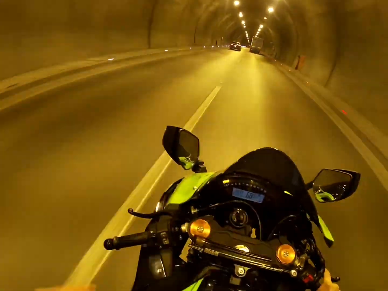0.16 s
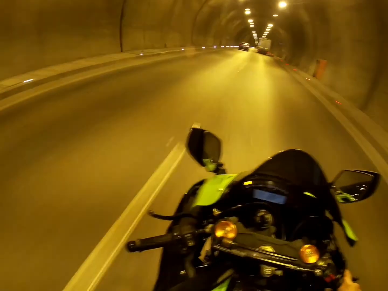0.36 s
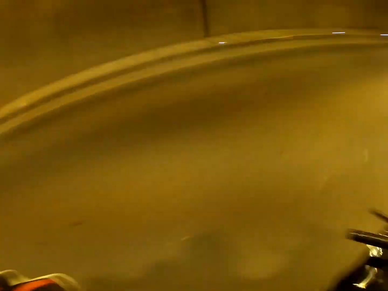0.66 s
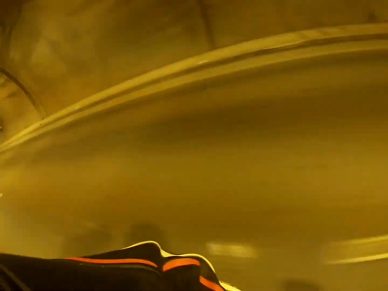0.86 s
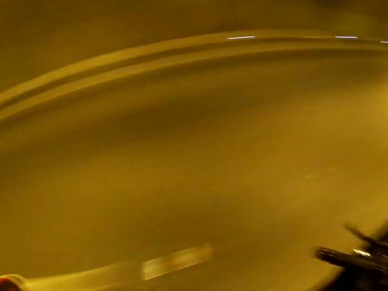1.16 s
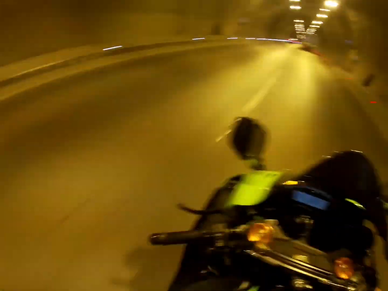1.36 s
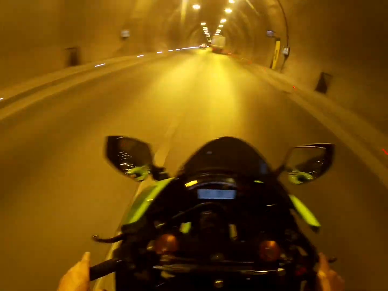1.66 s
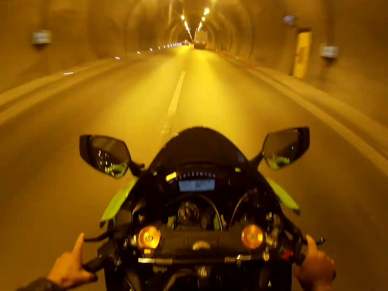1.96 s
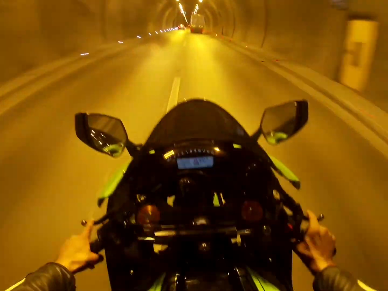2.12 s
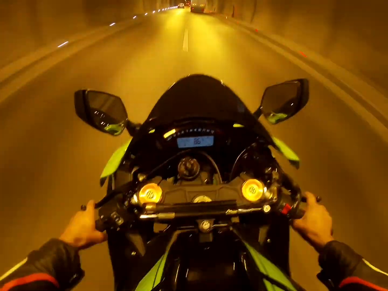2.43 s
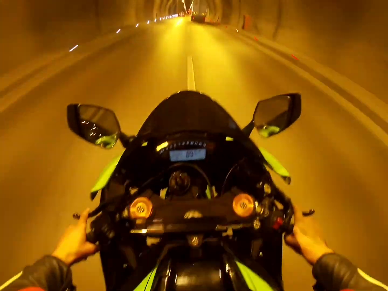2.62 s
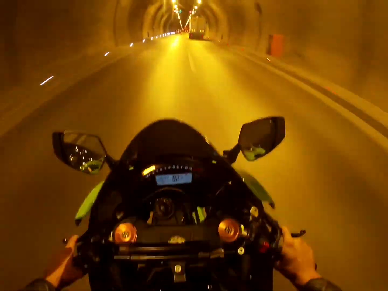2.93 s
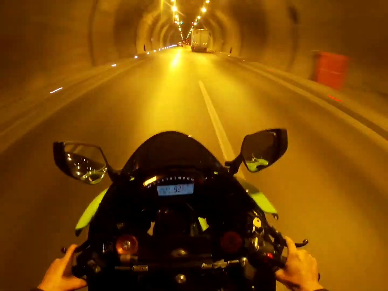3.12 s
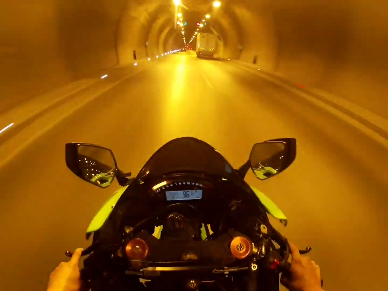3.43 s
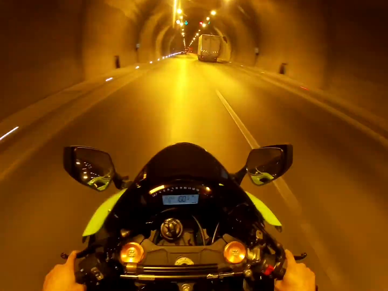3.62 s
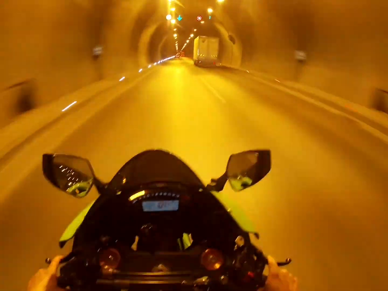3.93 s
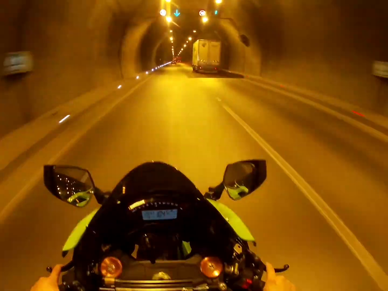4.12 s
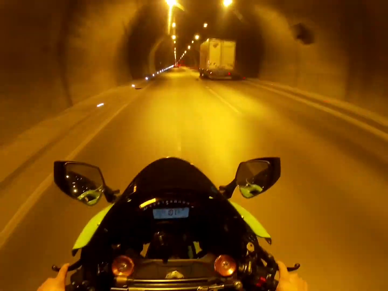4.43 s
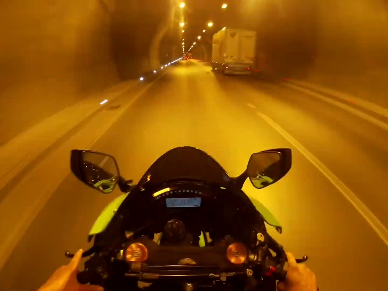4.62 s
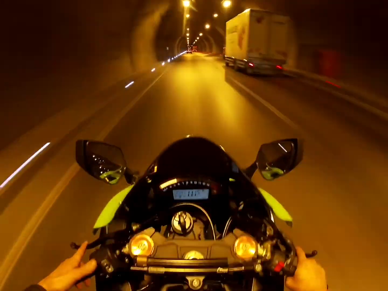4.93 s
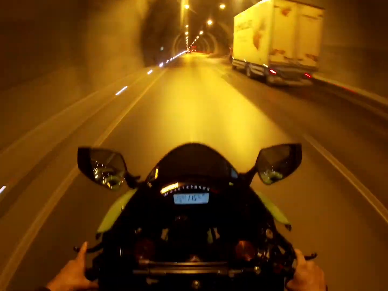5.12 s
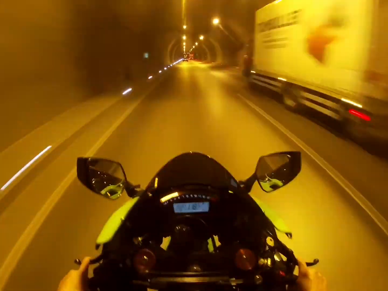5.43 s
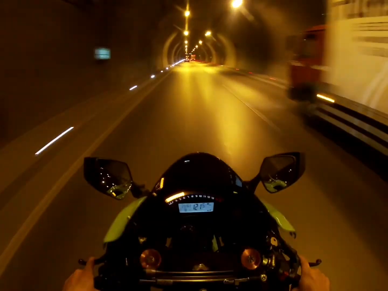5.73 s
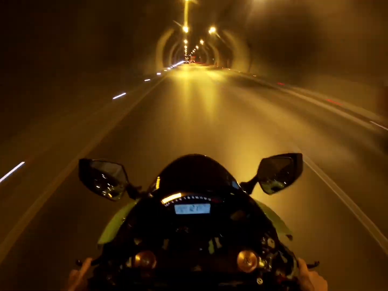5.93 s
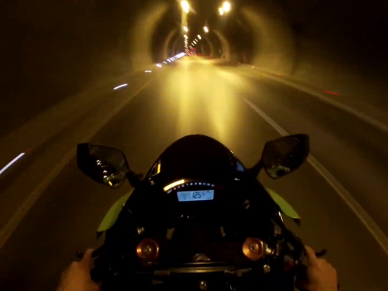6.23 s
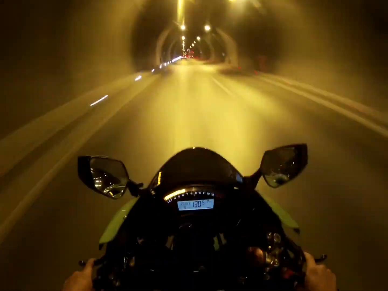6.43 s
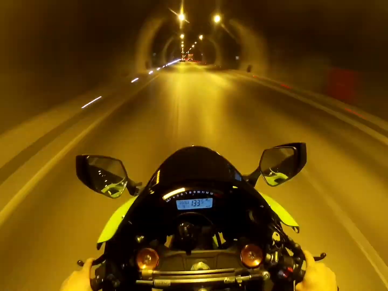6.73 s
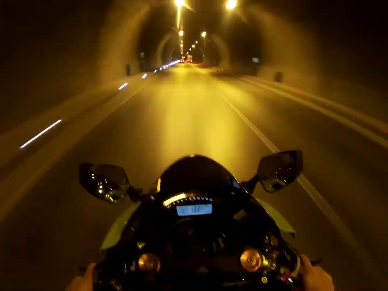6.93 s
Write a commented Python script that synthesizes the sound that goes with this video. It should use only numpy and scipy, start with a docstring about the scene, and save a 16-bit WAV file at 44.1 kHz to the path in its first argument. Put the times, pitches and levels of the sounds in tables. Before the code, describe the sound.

A microphone at a motorcycle rider's helmet captures about 7 seconds of unbroken acceleration in one gear inside a road tunnel. At 0 s the four-cylinder engine is a buzzy low drone around 107 Hz, with a raspy edge and a wavering low hum. From 0.5 to 1.3 s the air noise dips, then flutters, while tunnel rumble swells. From about 1.5 s small wind gusts come and go and the intake roar builds; gear whine shows faintly in the treble, clearest around 2.4-4.8 s. Roar and wind are strongest near 4-5 s. After 5.5 s the roar and whine recede, leaving a smoother, heavier howl reaching about 220 Hz at the end. Throughout, the tones flicker, fade and beat with slightly lower-pitched wall echoes over deep booming rumble. The sound is mildly saturated, with muffled treble, and stops while still climbing.

```python
"""A four-cylinder sport motorcycle accelerates in one gear through a road tunnel, heard at the helmet.
Exhaust orders, sines at multiples of the firing rate, glide up, beat with a wall copy, fade and dip.
Delayed copies of the engine off the passed wall ribs drop in pitch.
Intake roar and wind hiss (shaped noise), tunnel rumble, gear whine and a low wavering hum lie under it.
The input stage rounds the peaks; the camera case dulls the treble."""
import sys
import numpy as np
from scipy import signal
from scipy.fft import rfft, irfft
from scipy.io import wavfile
from scipy.ndimage import uniform_filter1d

SR = 44100
rng = np.random.default_rng(int(sys.argv[2]) if len(sys.argv) > 2 else 0)


def inscribe(sig):
    """Save sig as 16-bit PCM at rate SR to the path in sys.argv[1].

    A 1-D sig is mono; a 2-D sig holds one channel per row.
    Samples are clipped to [-1, 1] before scaling.
    """
    pcm = np.round(np.clip(np.atleast_2d(sig).T, -1, 1) * 32767)
    wavfile.write(sys.argv[1], SR, pcm.astype(np.int16))


N = 311785
TIME_S = np.arange(N) / SR

# air noise at the helmet before gusts: (time [s], intake roar [dB], wind base [dB])
AIR_DB = [(0, -35.5, -45.5), (.3, -31, -42.5), (.6, -29.5, -40), (.72, -38, -45), (1.08, -28, -46),
          (1.2, -29, -42.5), (1.5, -34.5, -43), (1.9, -27.5, -43), (2.5, -28.5, -44), (3.0, -25.5, -39),
          (3.4, -23.5, -38.5), (4.0, -24.5, -35.5), (4.2, -20.5, -35), (4.47, -27, -36.5),
          (4.52, -21.5, -32.6), (4.72, -22, -32), (4.8, -23.5, -35.5), (4.97, -23, -36.5), (5.25, -25, -35),
          (5.5, -27, -36), (5.6, -27.5, -38), (5.85, -32.5, -40), (6.1, -31, -38.5), (6.3, -29, -39),
          (6.55, -34.5, -39.5), (6.7, -27.5, -38), (7.07, -29.5, -39)]
# short rises and lulls of the air noise: (time [s], rise [dB], negative = lull)
GUSTS_AND_LULLS = [(.32, 0.5), (1.32, 2), (1.62, 2.5), (1.87, 3), (2.03, 4), (2.42, 0.5), (2.78, 3.5),
                   (3.12, 1.5), (3.37, 4), (3.57, 1.5), (3.76, 4), (4.0, -3.5), (4.54, 0), (5.23, 0.5),
                   (6.08, 3), (6.42, -2), (6.57, -5), (6.77, 0), (6.87, -4.5)]
GUST_HALF_S = .036


def undb(db):
    """Amplitude ratio of a dB value."""
    return 10 ** (np.asarray(db) / 20)


def curve(rows):
    """Columns of a time table, one value a sample."""
    s, *columns = np.transpose(rows)
    return [np.interp(TIME_S, s, column) for column in columns]


def colour(shape, hz):
    """dB of a spectrum at hz, interpolated over log frequency."""
    shape_hz, shape_db = np.transpose(shape)
    return np.interp(np.log(hz), np.log(shape_hz), shape_db)


def bells(rows, half_s):
    """A dB curve with one bell for each (time [s], height [dB]) row."""
    return sum(db * np.exp(-((TIME_S - s) / half_s) ** 2) for s, db in rows)


def swells(multiple):
    """dB curve of the stretches in which one upper order or gear tone stands out or sinks."""
    # (time [s], multiple of the firing rate [-], rise [dB], negative = it sinks)
    swell_rows = [(.45, 5.5, 5), (1.05, 6, 6), (1.05, 8, 9), (1.35, 41.65, 7), (1.6, 9, 3), (1.7, 4.5, -10),
                  (1.95, 7, 5), (2.1, 6.5, 7), (2.55, 6, 4), (2.55, 6.5, -5), (2.25, 35.7, 6),
                  (2.7, 35.7, 2), (2.45, 29.75, 6), (5.55, 4.5, 4), (5.55, 5, 3), (3.7, 6.5, 2),
                  (3.9, 29.75, 3), (.85, 5, 4), (.25, 5, 3), (.3, 4.5, 3), (3.25, 29.75, 6), (3.45, 7.5, 7),
                  (4.05, 7, 8), (4.2, 5, 2), (4.5, 29.75, 6), (5.85, 4.5, -4)]
    return bells([(s, db) for s, k, db in swell_rows if k == multiple], half_s=.22)


def walk(rate):
    """Random levels held 1 / rate s and slewed twice; spread near 1."""
    hold = int(SR / rate)
    steps = np.repeat(rng.standard_normal(N // hold + 1), hold)
    return 1.7 * uniform_filter1d(uniform_filter1d(steps, hold), hold)[:N]


def noise(shape, swell_db, flicker_db, rate):
    """Coloured noise in half-octave bands that swell together and flicker alone; rms 1."""
    hz = np.maximum(np.fft.rfftfreq(N, 1 / SR), 1)
    low_hz, high_hz = shape[0][0], shape[-1][0]
    inside = (hz >= low_hz) & (hz <= high_hz)
    spectrum = rfft(rng.standard_normal(N)) * undb(colour(shape, hz)) * inside
    common_db = swell_db * walk(rate)
    out = np.zeros(N)
    for centre in np.arange(2 * np.log2(low_hz), 2 * np.log2(high_hz) + 1):  # half octaves
        share = np.clip(1 - np.abs(2 * np.log2(hz) - centre), 0, 1)
        out += irfft(spectrum * share, N) * undb(common_db + flicker_db * walk(rate))
    return out / np.sqrt(np.mean(out ** 2))


def low_hum():
    """A tone wavering in pitch and level like a randomly shaken resonance, perhaps the fairing."""
    hum_db = [(0.0, -31), (0.2, -16.5), (0.6, -19), (1.4, -24.5), (2.3, -24), (2.45, -13.5), (2.62, -23),
              (2.8, -23.5), (3.0, -25), (3.2, -16), (3.45, -18.5), (3.8, -37), (4.3, -22.5), (5.0, -40.5),
              (5.7, -30.5), (5.85, -31), (6.0, -28.5), (6.3, -24), (6.45, -33), (7.07, -50)]  # (time [s], level before wavering [dB])
    phase = 2 * np.pi * np.cumsum(65.5 + 3 * walk(18)) / SR
    return np.sqrt(2) * undb(curve(hum_db)[0] + .78 * walk(10)) * np.sin(phase)


def tunnel_rumble():
    """Two bands of shaped noise between the orders, each on its own level curve."""
    rumble_db = [(0, -26, -28), (.5, -21, -21), (1, -18.5, -17.5), (1.5, -26, -23.5), (2, -25, -20.5),
                 (2.5, -19.5, -26), (3, -16.5, -21), (3.5, -16.5, -25), (4, -17, -21), (4.5, -18, -24),
                 (5, -19, -24.5), (5.5, -18, -28.5), (6, -17.5, -30.5), (6.5, -22, -24.5),
                 (7.07, -18.5, -37)]  # (time [s], deep part [dB], upper part [dB])
    # spectra of the parts: (frequency [Hz], relative level [dB])
    deep_shape = [(20, -5.5), (35, -3.5), (60, -5.5), (95, -7.5), (135, -2.5), (175, -4.5), (230, -2.5),
                  (300, -29)]
    upper_shape = [(160, -14), (230, -3), (280, -1.5), (420, 1), (520, -9.5), (700, -18.5)]
    deep_db, upper_db = curve(rumble_db)
    deep = undb(deep_db) * noise(deep_shape, swell_db=.7, flicker_db=1.5, rate=9)
    upper = undb(upper_db) * noise(upper_shape, swell_db=.7, flicker_db=1.5, rate=9)
    return deep + upper


def gear_whine(phase):
    """Tooth-mesh tones, blurred by random phase, let out by the gear case in one band."""
    gear_rows = [(23.8, -8), (29.75, -8), (35.7, -6), (41.65, -11)]  # (tooth meshes per firing [-], relative level [dB])
    case_shape = [(3000, -26), (3500, -17), (3900, -24), (4300, -15), (4600, -13), (5300, -14), (5700, -22),
                  (6200, -44), (8000, -75), (11000, -90)]  # (frequency [Hz], relative level [dB])
    # the whine sinks under the wind at speed: (time [s], relative level [dB])
    whine_db = [(0, -2), (2, -1), (2.4, 2), (3.4, 2), (4.8, 0), (5.5, -8), (7.07, -9)]
    hz = np.gradient(phase) * SR / (2 * np.pi)
    tones = np.zeros(N)
    for k, db in gear_rows:
        tone_db = db + colour(case_shape, k * hz) + swells(k) + 1 - 2.2 * walk(20) ** 2
        tones += undb(tone_db) * np.sin(k * phase + 1.3 * walk(60))
    return undb(curve(whine_db)[0]) * tones


def wind(phase):
    """Air noise at the helmet: gusting hiss that carries the gear whine, and a thin treble that follows it."""
    # spectra: (frequency [Hz], relative level [dB])
    hiss_shape = [(900, 1.5), (1500, 2.5), (2500, -4.5), (4000, -9.5), (5300, -11), (6000, -16.5),
                  (6800, -30.5), (7500, -34.5), (9000, -53.5)]
    thin_shape = [(6000, -2.5), (7300, -6), (8500, 2), (9200, -5), (10500, -9.5), (12300, -11.5)]
    random_gusts_db = .3 * walk(40)
    wind_db = curve(AIR_DB)[1] + bells(GUSTS_AND_LULLS, GUST_HALF_S) + random_gusts_db
    hiss = noise(hiss_shape, swell_db=.3, flicker_db=.7, rate=29)
    # sags 1.6 dB per s and follows .9 of the wind's departure from -41 dB
    thin_db = -61 - 1.6 * TIME_S + .9 * (wind_db + 41)
    thin = undb(thin_db) * noise(thin_shape, swell_db=1.6, flicker_db=.9, rate=33)
    return undb(wind_db + 3.5) * (hiss + gear_whine(phase)) + thin


def intake(hz, phase):
    """Weaker orders through the airbox, each fading on its own, over air roar puffed once per firing."""
    # halves come once per crank turn:
    # (multiple of the firing rate [-], relative level [dB], addition at the start, before load [dB])
    upper_orders = [(4.5, -13, 7), (5, -10, 4), (5.5, -12, -3), (6, -11, -4), (6.5, -11, -10), (7, -18, 0),
                    (7.5, -19, -6), (8, -16, -5), (8.5, -22, -3), (9, -17, -1), (9.5, -22, -2),
                    (10, -18, -1), (11, -20, 0), (12, -22, 0)]
    airbox_shape = [(450, 2), (560, 0), (800, 0), (900, 1), (1160, 0), (1220, -7), (1350, -11), (2500, -12)]  # (frequency [Hz], relative level [dB])
    roar_shape = [(220, 10.5), (420, 1), (550, 4), (800, 2.5), (1100, 1), (1400, -8.5), (2200, -37.5)]  # (frequency [Hz], relative level [dB])
    orders_in_roar_db = [(0, 0), (2, -1.5), (3, 1), (5.2, 0.5), (5.8, -7.5), (7.07, 0.5)]  # (time [s], orders against the roar [dB])
    on_load_s = 3.
    light_load = np.clip(1 - TIME_S / on_load_s, 0, 1)
    orders = np.zeros(N)
    for k, db, early_db in upper_orders:
        order_db = db + early_db * light_load + swells(k) + colour(airbox_shape, k * hz)
        fade_db = 1.9 * walk(15) ** 2
        orders += undb(order_db + 2 - fade_db) * np.sin(k * phase + .42 * walk(30))
    orders *= np.sqrt(2) * undb(curve(orders_in_roar_db)[0])
    puffs = 1 + .4 * np.sin(phase)
    roar = puffs * noise(roar_shape, swell_db=1.1, flicker_db=.9, rate=11)
    gusts = undb(.8 * bells(GUSTS_AND_LULLS, GUST_HALF_S))  # the roar shows .8 of the dB change
    return undb(curve(AIR_DB)[0]) * (orders + gusts * roar)


def wall_echoes(engine, hz):
    """Each rib of the lining echoes as it slides by; the path grows behind the bike, so the pitch drops."""
    metres_per_firing, wall_m, rib_spacing_m, sound_m_per_s = .21, 5., 5., 343.
    place_m = np.cumsum(hz) * metres_per_firing / SR
    ribs_m = np.arange(-30, place_m[-1] + 10, rib_spacing_m)
    chance = rng.standard_normal((len(ribs_m), 2))
    out = np.zeros(N)
    for rib_m, (shift_m, size) in zip(ribs_m, chance):
        at_m = rib_m + shift_m
        lo, hi = np.searchsorted(place_m, [at_m - 8, at_m + 32])
        behind_m = place_m[lo:hi] - at_m
        path_m = 2 * np.hypot(wall_m, behind_m)
        # the pipe points backwards; far ribs fade out
        aim = np.clip((behind_m + 8) / 14, 0, 1) * np.clip((32 - behind_m) / 16, 0, 1)
        delayed = np.arange(lo, hi) - path_m / sound_m_per_s * SR
        heard = np.interp(delayed, np.arange(N), engine, left=0)
        out[lo:hi] += undb(4.5 * size) * aim * 2 * wall_m / path_m * heard
    return out


def exhaust(hz, phase):
    """The low orders as lines; a blurred copy off the receding wall lies a little lower and beats with each."""
    # level before fading: (time [s], first order [dB], second [dB], third [dB])
    main_orders_db = [(0.0, -15.5, -9, -20), (0.2, -18, -15.5, -20.5), (0.4, -20, -19.5, -17),
                      (0.6, -20.5, -17.5, -11.5), (0.8, -20, -16.5, -13), (1.0, -11.5, -19.5, -15.5),
                      (1.2, -12, -17, -11.5), (1.4, -17, -14, -16), (1.6, -14, -13, -13.5),
                      (1.8, -10.5, -12, -14.5), (2.0, -11.5, -9.5, -27), (2.2, -9, -18.5, -16),
                      (2.4, -12, -20.5, -16), (2.6, -12, -12, -16.5), (2.8, -14, -13, -17.5),
                      (3.0, -12.5, -13, -28), (3.2, -15.5, -21.0, -19.5), (3.4, -19.5, -17.5, -22.5),
                      (3.6, -12, -13, -19.5), (3.8, -8.5, -20, -22), (4.0, -12.5, -16, -23.5),
                      (4.2, -14.5, -17.5, -28), (4.4, -11, -13, -33), (4.6, -13, -12, -34),
                      (4.8, -5, -18.5, -28.5), (5.0, -14, -18, -36), (5.2, -8.5, -19, -31),
                      (5.4, -10.5, -17.5, -46), (5.6, -5.5, -16.5, -51), (5.8, -17.5, -11, -46.5),
                      (6.0, -14, -11, -32), (6.2, -13.5, -13.5, -34), (6.4, -7.5, -14, -35),
                      (6.6, -8, -14.5, -42), (6.8, -8.5, -15, -33), (7.07, -7, -19.5, -36)]
    # orders beside them: (multiple of the firing rate [-], level before pipe [dB], slope [dB per s])
    side_orders = [(1.5, -33, 0), (2.5, -18, -6.5), (3.5, -21, -3), (4, -19.5, 1)]
    side_swell_db = [(0, -2), (.3, 4.5), (.5, -5), (.75, 3), (1.0, 1.5), (1.2, -1.5), (1.4, 3), (1.6, -1),
                     (2, -8.5), (2.6, -2.5), (3.2, 5.5), (4.2, -3.5), (5, -2), (5.6, -3), (7.07, 0)]  # (time [s], swell of the side orders [dB])
    # pipe resonance that the side orders cross: (frequency [Hz], relative level [dB])
    pipe_shape = [(150, -28.5), (250, -10), (360, -22), (410, -0.5), (435, -4.5), (465, -3.5), (500, -5.5),
                  (530, -22), (620, -18), (900, -27)]
    # copy by way of the nearest wall: (time [s], amplitude relative to direct [-])
    wall_share = [(0, .2), (3, .22), (4.5, .22), (5.5, .28), (6, .18), (7.07, .22)]
    # brief level dips of single orders: (time [s], order [-], depth [dB], negative = rise)
    dip_rows = [(.07, 4, 28), (.27, 1, 6), (.48, 4, 13), (.62, 2, 10), (.7, 1, 6), (.875, 3, 13),
                (1.04, 2, 9), (1.21, 4, 16), (1.23, 2, 16), (1.3, 3, 12), (1.62, 3, 9), (1.86, 3, 25),
                (2.06, 1, 12), (2.331, 3, 6), (2.44, 1, 15), (2.681, 1, 5), (2.751, 3, 6), (3.42, 1, 1),
                (2.561, 1, 15), (2.8, 2, 11), (3.619, 3, 24), (3.789, 2, 7), (3.9, 3, 26), (4.582, 2, 20),
                (5.2, 1, 19), (6.74, 1, 3.5), (6.74, 2, 17), (.15, 2, 4), (1.11, 2, 14), (4.16, 2, 22),
                (4.48, 1, 7), (4.71, 2, 17), (5.0, 1, 11), (5.12, 2, 15), (5.45, 1, 6), (5.71, 1, 10),
                (5.92, 2, 5.5), (6.09, 2, 3), (3.06, 3, 11), (2.97, 2, 1), (.53, 4, 12), (.22, 3, 6),
                (.43, 3, -0.5), (1.152, 3, 7), (4.3, 3, 7), (4.6, 3, 16), (6.0, 3, 5), (6.4, 3, 9.5),
                (6.75, 3, 7), (5.6, 4, 12), (5.85, 4, 15), (6.05, 4, 6), (6.47, 4, 12), (6.65, 4, 10),
                (1.1, 4, 7), (6.07, 1, 25.5), (6.58, 1, 5), (6.62, 2, 19), (6.89, 1, 17)]
    wall_slip, wall_blur_per_s = .05, 30  # pitch share the copy lies lower; waver rate per order

    lines = list(zip((1, 2, 3), curve(main_orders_db)))
    for k, db, slope in side_orders:
        side_db = db + curve(side_swell_db)[0] + slope * TIME_S + colour(pipe_shape, k * hz)
        lines.append((k, side_db))
    share = curve(wall_share)[0]
    out = np.zeros(N)
    for k, db in lines:
        blur = walk(k * wall_blur_per_s) + 1j * walk(k * wall_blur_per_s)
        paths = 1 + share * blur * np.exp(-1j * wall_slip * k * phase)  # direct + wall
        dips = [(s, depth) for s, order, depth in dip_rows if order == k]
        fade_db = .42 * walk(16) ** 2
        line_db = db - fade_db - bells(dips, half_s=.025)
        out += np.sqrt(2) * undb(line_db) * np.imag(paths * np.exp(1j * k * phase))
    return out


def scene():
    """Engine, its echoes and the background noises at the helmet."""
    revs = [(0, 106.8), (.44, 112), (.88, 117.3), (1.32, 122.8), (1.77, 129.6), (2.21, 137), (2.65, 144.2),
            (3.09, 151.1), (3.53, 159), (3.97, 167), (4.42, 175.3), (4.86, 182.5), (5.3, 190.1),
            (5.74, 197.8), (6.18, 205.7), (6.62, 214.2), (7.07, 222.6)]  # (time [s], firing rate [Hz])
    hz = curve(revs)[0]
    phase = 2 * np.pi * np.cumsum(hz) / SR
    engine = exhaust(hz, phase) + intake(hz, phase)
    echoes = undb(-17) * wall_echoes(engine, hz)
    return (engine + echoes + tunnel_rumble() + low_hum() + wind(phase))[None]


def record(dry):
    """The input stage rounds the peaks, the treble rolls off and the top is cut."""
    rounded = .96 * np.tanh(dry / 1.057)
    dulled = signal.sosfilt(signal.butter(2, 10000, fs=SR, output="sos"), rounded)
    return signal.sosfilt(signal.ellip(8, .2, 70, 12400, fs=SR, output="sos"), dulled)


dry = scene()
out = record(dry)
inscribe(out)
```